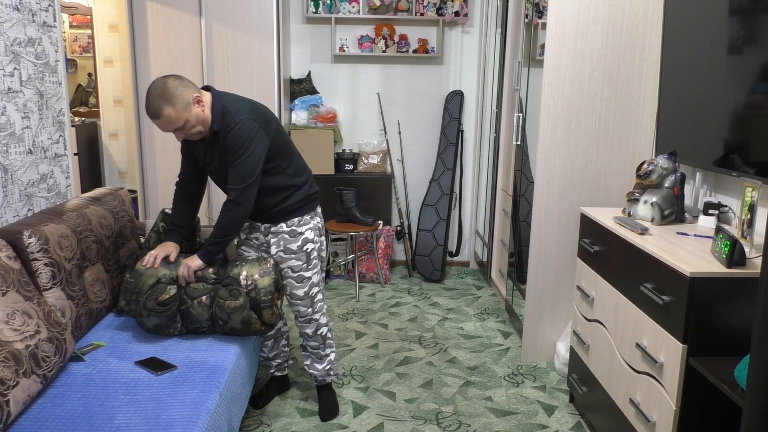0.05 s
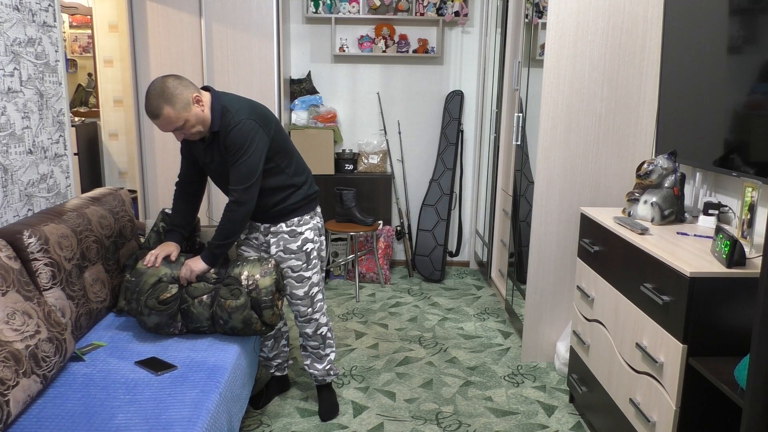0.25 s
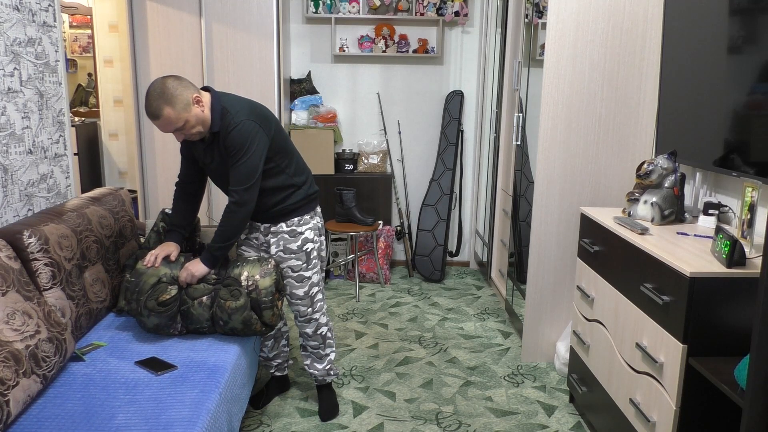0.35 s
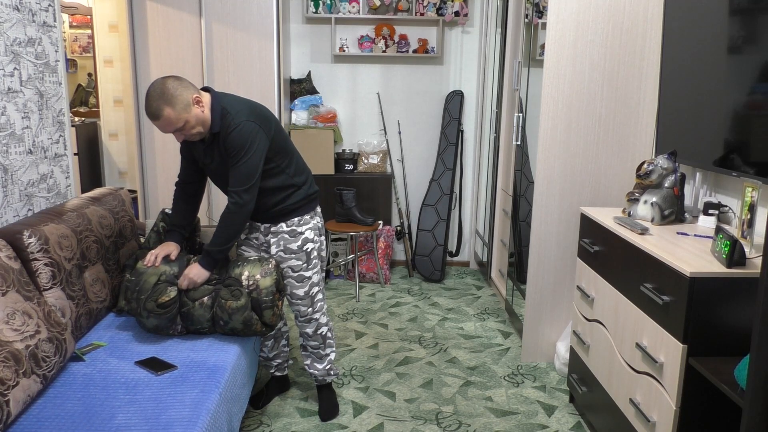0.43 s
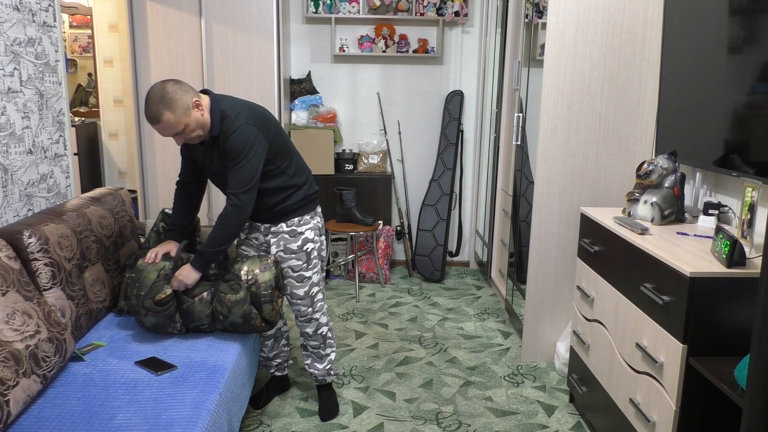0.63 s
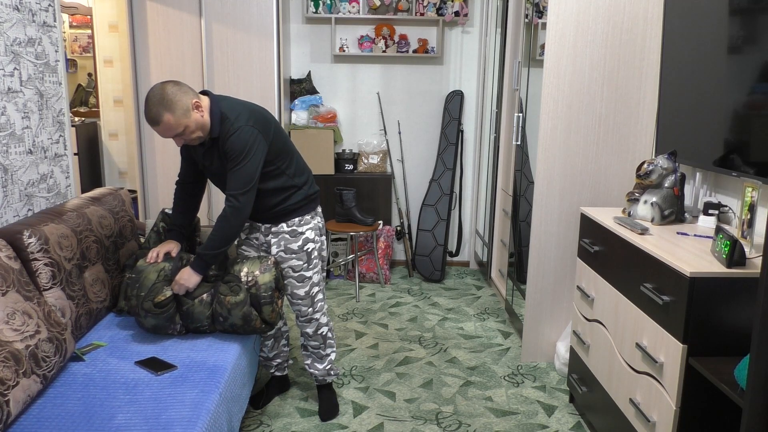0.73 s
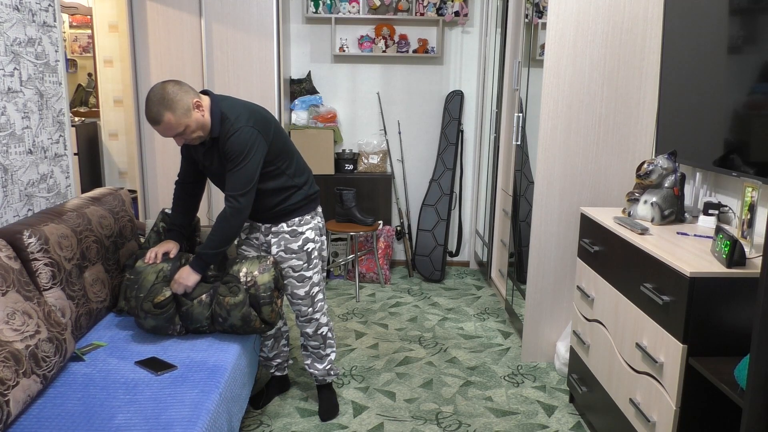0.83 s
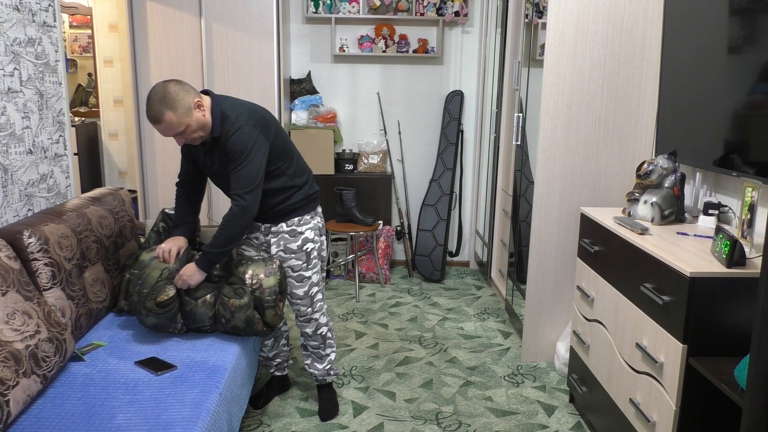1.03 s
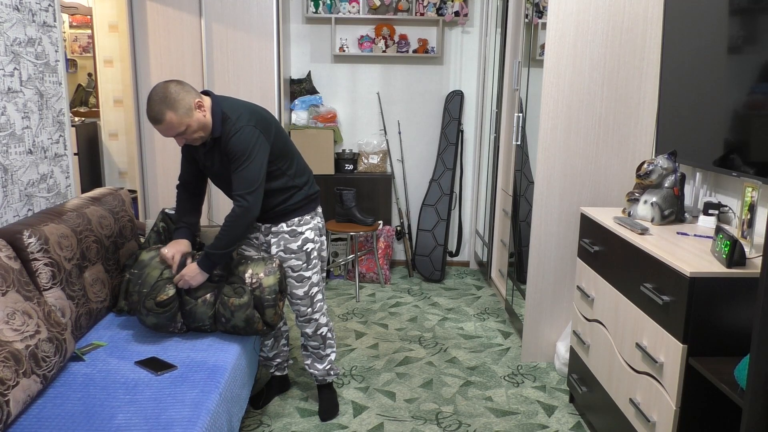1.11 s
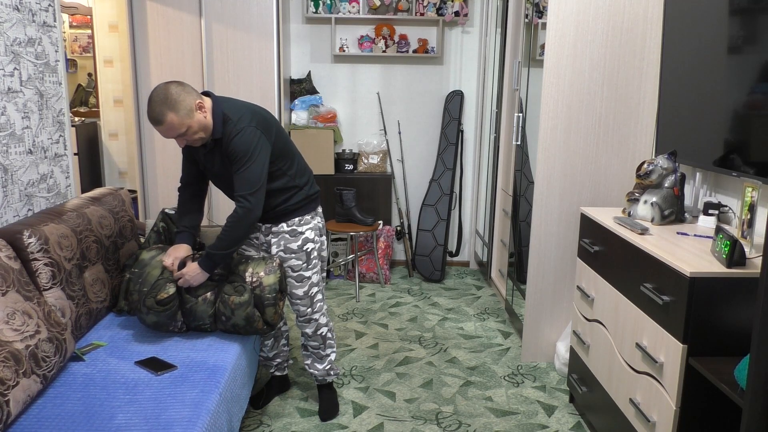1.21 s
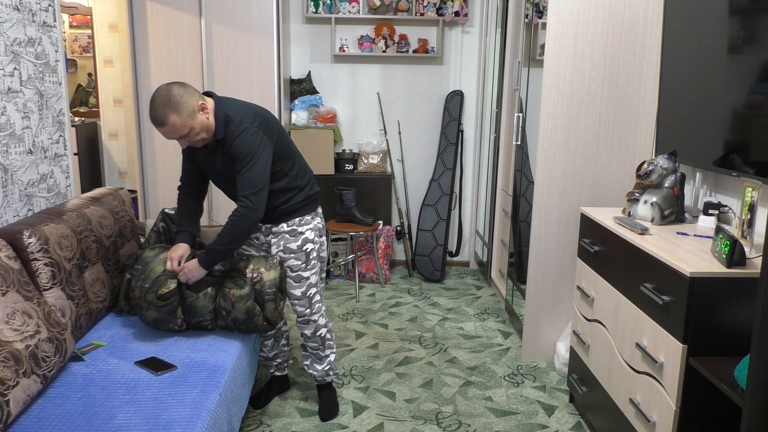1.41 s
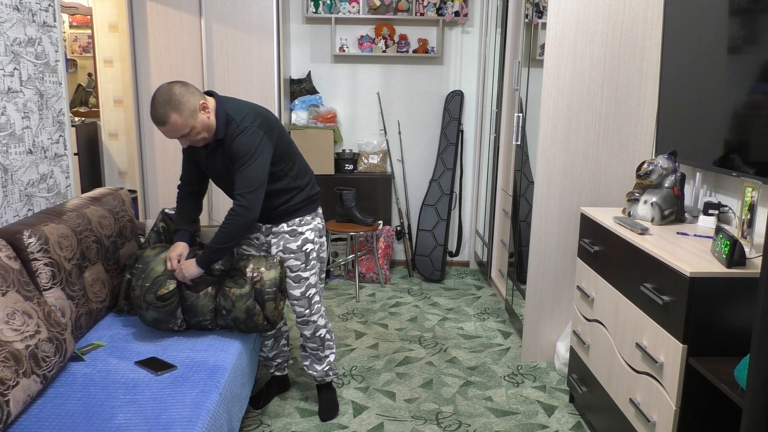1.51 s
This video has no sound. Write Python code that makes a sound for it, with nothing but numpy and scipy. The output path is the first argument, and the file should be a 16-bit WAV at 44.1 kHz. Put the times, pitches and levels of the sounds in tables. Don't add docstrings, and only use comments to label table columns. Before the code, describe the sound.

Close, dry rustling of slick padded fabric handled in a quiet home room, starting lightly, bumping low as a strap slips quickly through its buckle, then hissing and crackling brightly before easing off.

```python
import sys
import numpy as np
from scipy import signal
from scipy.fft import rfft, irfft, next_fast_len
from scipy.io import wavfile
from scipy.ndimage import uniform_filter1d, map_coordinates

SR = 44100
rng = np.random.default_rng(int(sys.argv[2]) if len(sys.argv) > 2 else 0)


def bounce(signal):
    frames = np.transpose(np.atleast_2d(signal))
    limited = np.clip(frames, -1, 1)
    pcm = np.round(limited * 32767).astype(np.int16)
    wavfile.write(sys.argv[1], SR, pcm)


def volts(x):
    e = np.asarray(x, float) / 20
    return 10 ** e


N = 68355


def noise():
    return rng.standard_normal(N)


def unit(x):
    return x / np.sqrt(np.mean(x ** 2) + 1e-20)


def filtered(x, response):
    m = next_fast_len(len(x) + 8192)
    return irfft(rfft(x, m) * response(np.fft.rfftfreq(m, 1 / SR)), m)[:len(x)]


def coloured(x, points):
    point_hz, db = np.transpose(points)

    def response(hz):
        return volts(np.interp(np.log(hz + 1), np.log(point_hz + 1), db, -120, -120))

    return unit(filtered(x, response))


def resonant(x, peaks):
    def response(f):
        return sum(volts(db) * 1j * f * w / (c * c - f * f + 1j * f * w) for c, w, db in peaks)

    return filtered(x, response)


def wobble(rate):
    return map_coordinates(rng.standard_normal(999), [np.arange(N) * rate / SR])


def gate(start, length, rise, fall):
    t = np.arange(N) / SR - start
    return np.clip(t / rise + .5, 0, 1) ** 2 * np.exp(-np.clip(t - length, 0, None) / fall)


def grainy(spectrum, patchy_db):
    grains_per_s, spread_db, grain_share = 9000, 2.2, .4
    chance, size, side = rng.random((3, N))
    clicks = (chance < grains_per_s / SR) * volts(-spread_db * np.log(size + .003)) * np.sign(side - .5)
    mixed = np.sqrt(grain_share) * unit(clicks) + np.sqrt(1 - grain_share) * noise()
    z = signal.stft(mixed, nperseg=256)[2]
    patches = uniform_filter1d(rng.standard_normal(z.shape), size=5, axis=0)
    patches = unit(uniform_filter1d(patches, size=12, axis=1))
    patchy = signal.istft(z * volts(patchy_db * patches), nperseg=256)[1][:N]
    return coloured(patchy, spectrum)


# frequency in Hz, level in dB per Hz.
WEAVE = [(900, -10), (1400, -2.5), (2000, -8), (2800, -0.5), (4100, -6.5), (4700, -3), (6200, -4.5),
         (7600, -10), (15700, -19)]
SHEEN = [(6000, -12), (8600, 2.5), (11000, 0), (13800, -3), (15800, 2.5)]
BODY = [(88, -15), (150, -2.5), (385, -1), (431, -0.5), (723, 2), (866, -5), (1310, -1.5), (2200, -24),
        (3400, -41)]
# start in seconds, length in seconds, level in dB, sheen in dB, body in dB.
STROKES = [(-.02, 0.025, -42.5, -4, -9), (0.064, 0.022, -50.5, -7, 14), (0.128, 0.023, -45, -4, -3),
           (0.145, 0.014, -35, -12, -8), (0.189, 0.045, -43, -1, 2.5), (0.226, 0.018, -28, -15, 2.5),
           (.262, 0.024, -33.5, -19, 1.5), (0.3, 0.013, -32, -24, 7), (0.328, 0.059, -28, -18, 2.5),
           (0.39, 0.064, -35, -3, 6), (0.478, 0.22, -44.5, 10, -3), (0.623, .14, -30.5, -17, -6),
           (0.813, 0.092, -27, 7, -3.5), (0.909, 0.056, -28, 5, 0.5), (0.954, 0.088, -25.5, 7.5, -6.5),
           (1.048, .1, -28.5, 3, 1), (1.151, .11, -30.5, 5, 1.5), (1.268, 0.077, -35, 4, -1),
           (1.368, 0.046, -40.5, 3, 0.5), (1.422, 0.045, -35.5, -1, -2.5), (1.487, 0.071, -43.5, -6, 2.5)]


def rubbing():
    weave_db, sheen_db, body_db = -1, -14.5, -1.5
    shapes = np.array([gate(start, length, 0.019 + 0.088 * length, 0.018) * volts(db)
                       for start, length, db, _, _ in STROKES])
    _, _, _, stroke_sheen_db, stroke_body_db = np.transpose(STROKES)
    grip = volts(0.56 * wobble(35.06) + 0.71 * wobble(120))

    def drive(db):
        return grip * np.sqrt(volts(2 * db) @ shapes ** 2)

    weave = drive(np.full(len(STROKES), weave_db)) * grainy(WEAVE, patchy_db=1.0)
    sheen = drive(sheen_db + stroke_sheen_db) * grainy(SHEEN, patchy_db=1.5)
    body = drive(body_db + stroke_body_db) * grainy(BODY, patchy_db=3.5)
    return weave + sheen + body


# frequency in Hz, level in dB per Hz.
HUSH = [(35, -21), (60, 4.5), (149, -14), (292, -5.5), (1180, -10.5), (2110, -20), (4650, -22),
        (6300, -26.5), (15600, -32)]
RUMBLE = [(15, 9), (33, -2), (70, -19), (150, -20.5), (300, -28)]


def floor():
    hush_db, rumble_db = -42, -39
    lumps = volts(1.2 * wobble(13.5))
    rumble = unit(lumps * coloured(noise(), RUMBLE))
    return volts(hush_db) * coloured(noise(), HUSH) + volts(rumble_db) * rumble


# start in seconds, length in seconds, level in dB, pitch in Hz.
FOLDS = [(0.015, 0.016, -39, 200), (0.064, 0.0054, -37, 970), (0.235, 0.012, -24, 352),
         (0.299, 0.0089, -34, 1000), (0.44, 0.0078, -26, 660), (0.456, 0.021, -31, 290),
         (0.586, 0.032, -38.5, 410), (0.972, 0.024, -31.5, 1140), (0.95, 0.11, -29, 780),
         (1.011, 0.0095, -25.5, 970), (1.013, 0.015, -26, 276), (1.123, 0.022, -26.5, 503),
         (1.129, 0.0096, -27, 500), (1.146, 0.011, -29, 1400), (1.172, 0.02, -29, 700),
         (1.198, 0.027, -27, 463), (1.257, 0.059, -35.5, 485), (1.3535, 0.004, -26.5, 900),
         (1.434, 0.0083, -29.5, 450), (1.3535, 0.0034, -29.5, 3500), (0.826, 0.046, -28, 5300),
         (0.96, 0.06, -29, 13600), (0.995, 0.051, -32.5, 8500), (0.861, 0.05, -36.5, 270),
         (1.197, .045, -38, 5200), (.621, 0.013, -37.5, 4700), (1.514, .02, -41, 3300),
         (1.31, 0.038, -43, 8900), (1.456, .007, -37.5, 3800), (1.436, .008, -43, 5000),
         (.29, .02, -35, 400), (1.105, 0.025, -32.5, 1280), (.84, 0.034, -33.5, 430),
         (.405, 0.043, -32, 71), (.075, 0.013, -39, 92), (.82, 0.046, -39.5, 115), (1.225, 0.019, -35, 94),
         (1.2, .03, -40, 90), (0.54, .02, -41.5, 140)]


def folds():
    edge_s = 0.0009
    out = np.zeros(N)
    for start, length, db, hz in FOLDS:
        colour = [(hz, min(0.88 * hz, 2200), 0)]
        crumple = unit(resonant(resonant(noise(), colour), colour))
        out += volts(db) * gate(start, length, edge_s + 0.45 * length, edge_s + 0.59 * length) * crumple
    return out


# start in seconds, peak in dB, pitch in Hz.
THUMPS = [(0.032, -30.5, 108), (.039, -29, 113), (.048, -29, 120), (.1, -39, 29.6), (0.201, -38, 25),
          (0.236, -17, 110), (.244, -18, 91), (0.254, -20, 140), (0.257, -21, 58.6), (0.272, -16.5, 107),
          (.282, -24, 184), (.287, -21, 120), (0.307, -16, 129), (0.333, -13, 138), (.343, -18, 150),
          (0.463, -29, 55), (.6, -22, 65), (0.624, -20.5, 70), (0.645, -21, 78), (0.741, -32.5, 57.7),
          (0.897, -29.5, 28.7), (1.118, -31, 55), (1.142, -25, 60.4), (1.174, -27, 50), (1.301, -37.5, 40),
          (1.435, -29.5, 29.7), (1.462, -34, 60)]


def thumps():
    out = np.zeros(N)
    for start, db, hz in THUMPS:
        cycles = np.clip(np.arange(N) / SR - start, 0, None) * hz
        swell = 1 - np.exp(-cycles / 0.074)
        decay = volts(-60 * cycles / (2.24 * 1.14))
        out -= 3.78 * volts(db) * np.sin(2 * np.pi * cycles) * swell * decay
    return out


# start in seconds, peak in dB, pitch in Hz, 60 dB decay in seconds.
SNAPS = [(0.058, -29.5, 8000, 0.0066), (0.08, -31, 1320, 0.017), (.063, -31, 12000, 0.0046),
         (0.093, -31, 3500, 0.0096), (.1365, -26.5, 9000, 0.0071), (.153, -25, 4400, 0.01),
         (.1695, -27, 13000, .008), (.578, -33, 1500, .012), (.601, -34, 3000, 0.014),
         (0.6192, -14, 3100, 0.0022), (.7665, -23, 7000, .015), (1.022, -13.5, 2500, 0.0038),
         (1.1591, -11, 2670, 0.0087), (1.3557, -17, 3720, 0.019), (1.4575, -27, 3800, 0.008),
         (1.482, -25, 13000, .006), (1.5293, -18.5, 9000, 0.01), (1.53, -24.5, 3500, 0.009),
         (0.496, -29, 5500, .006), (.545, -36, 4000, .006), (.718, -24, 9000, .006),
         (1.51, -33, 12000, .006), (1.198, -22, 1500, 0.0091)]


def snaps():
    out, t = np.zeros(N + 4096), np.arange(4096) / SR
    for start, db, hz, t60 in SNAPS:
        crack = rng.standard_normal(len(t)) * volts(-60 * t / t60) * (1 - np.exp(-t / (0.12 * t60)))
        crack[2] -= 2.5
        colour = [(hz, 1.5 * hz, 0)]
        crack = resonant(resonant(crack, colour), colour)
        crack = filtered(crack, lambda f: 1 / (1 + 1j * f / (2.6 * hz)) ** 2)
        out[round(start * SR):][:len(t)] += volts(db) * crack / np.abs(crack).max()
    return out[:N]


# start in seconds, peak in dB, pitch in Hz, 60 dB decay in seconds.
PINGS = [(1.1442, -11, 620, .055), (1.1565, -12, 470, .03), (1.518, -29, 3150, .009),
         (1.537, -35, 3000, .012), (.9365, -17, 620, .015), (1.0195, -16, 330, .025), (.948, -21, 650, .04),
         (1.011, -19, 1000, .025), (1.133, -19, 520, .04), (1.16, -20, 250, .04), (.0785, -30, 1300, .015)]


def pings():
    out = np.zeros(N)
    for start, db, hz, t60 in PINGS:
        t = np.clip(np.arange(N) / SR - start, 0, None)
        swell = 1 - np.exp(-t / (0.13 * t60))
        out += 2.85 * volts(db) * np.sin(2 * np.pi * hz * t) * swell * volts(-60 * t / t60)
    return out


# time in seconds, slips per second, level in dB,
# ring pitch in Hz, ring level in dB.
STRAP = [
    (.344, 52, -28, 220, 3),
    (.356, 72, -14, 240, 6),
    (.375, 107, -15, 240, 10),
    (.391, 130, -18, 290, 4),
    (.408, 172, -21, 340, 12),
    (.42, 150, -19.5, 430, 14),
    (.433, 146, -19, 400, 9),
    (.451, 185, -25, 390, 13),
    (.461, 170, -45, 380, 8),
]


def strap():
    ring_width_hz, dull_hz, rasp_db = 130, 600, -8
    times, *columns = np.transpose(STRAP)
    t = np.arange(N) / SR
    rate, level_db, ring_hz, ring_db = [np.interp(t, times, c) for c in columns]
    on = (t > times[0]) & (t < times[-1])
    turns = .27 + np.cumsum(on * rate) / SR + .05 * wobble(90.1)
    k = np.arange(1, 13)[:, None]
    f = k * rate
    ring = volts(ring_db) * 1j * f * ring_width_hz / (ring_hz ** 2 - f * f + 1j * f * ring_width_hz)
    body = (1 + ring) / (1 + (f / dull_hz) ** 2)
    uneven = volts(3 * np.array([wobble(58.2) for _ in k]))
    uneven = uneven * np.linalg.norm(body / k, axis=0) / np.linalg.norm(body * uneven / k, axis=0)
    peaked_rad = .5
    saw = -np.imag(body * uneven / k * np.exp(2j * np.pi * k * turns - 1j * peaked_rad)).sum(axis=0)
    rasp = unit(resonant(noise(), [(360, 200, -2), (500, 200, -6)]))
    rasp = rasp * (rate / 140) ** 2
    return volts(level_db) * on * (saw + volts(rasp_db) * rasp)


def room(x):
    t60_s = .16
    t = np.arange(SR // 3) / SR
    tail = rng.standard_normal(len(t)) * volts(-60 * t / t60_s) * (t > .003)
    return signal.fftconvolve(x, tail / np.linalg.norm(tail))[:N]


def scene():
    near = rubbing() + folds() + snaps() + pings() + strap()
    room_db = -13
    return (near + volts(room_db) * room(near) + thumps() + floor())[None]


def low_pass(x):
    return signal.sosfilt(signal.butter(12, 15750, fs=SR, output="sos"), x)


def record(dry):
    low_hz, top_hz = 12, 15780
    mix = filtered(dry[0], lambda hz: (hz < top_hz) * 1j * hz / (low_hz + 1j * hz))[None]
    return low_pass(mix)


dry = scene()
out = record(dry)
bounce(out)
```